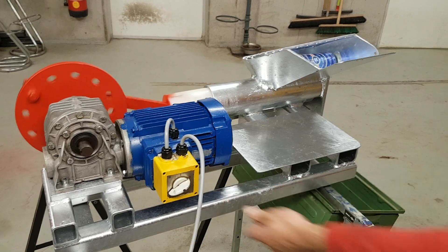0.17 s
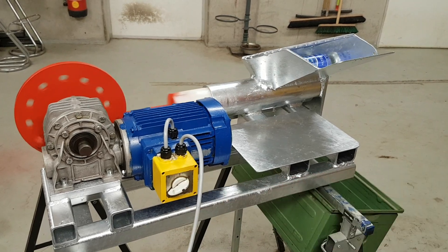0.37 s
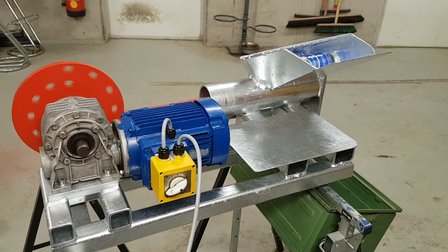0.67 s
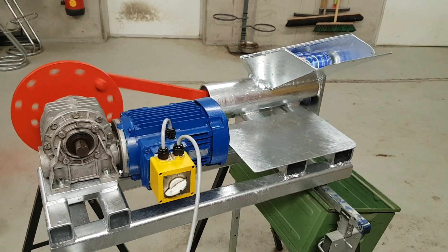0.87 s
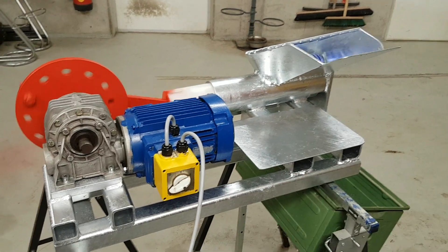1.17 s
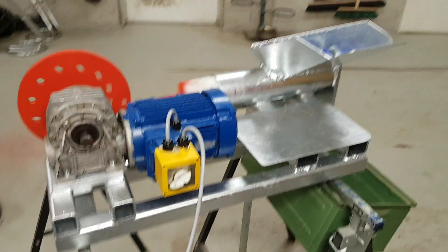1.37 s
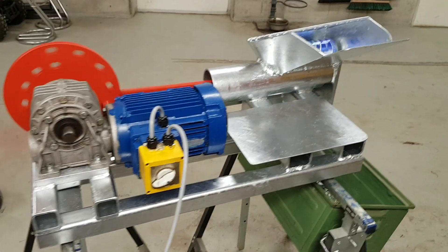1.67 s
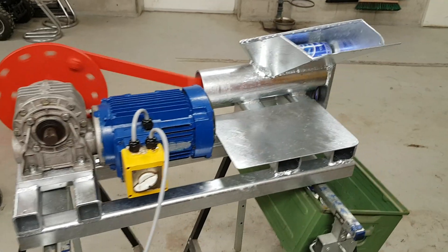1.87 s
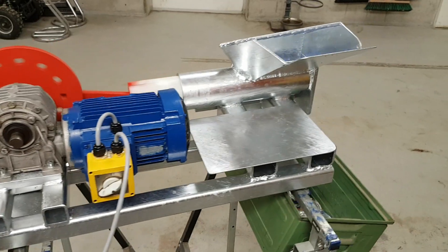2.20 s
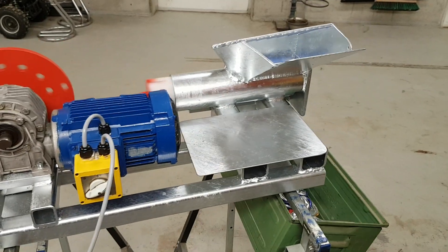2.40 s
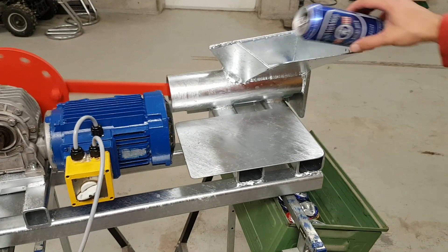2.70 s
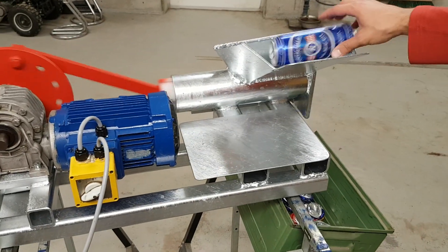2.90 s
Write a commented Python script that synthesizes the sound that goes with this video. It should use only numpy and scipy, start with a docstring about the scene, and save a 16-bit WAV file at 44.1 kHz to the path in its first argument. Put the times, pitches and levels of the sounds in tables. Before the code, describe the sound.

A motor-driven crusher flattens drink cans: each one clinks into a steel tube, then crunches and crackles in two bursts, with clanks between, over a low motor hum, recorded close in stereo in a hard, ringing workshop.

```python
"""Crunching metal about once a second: a can drops into a steel tube, is pushed along, buckles and is flattened.
A geared motor drives the ram and hums behind it; sheet metal booms and the linkage clanks on the return.
Bursts of small impulses and short rings make the crunch, decaying sines the blows, shaped noise the motor.
Early echoes and a hard workshop's ringing surround a two-port microphone."""
import sys
import numpy as np
from scipy import signal
from scipy.fft import rfft, irfft, next_fast_len
from scipy.io import wavfile
from scipy.ndimage import map_coordinates

SR = 44100
rng = np.random.default_rng(int(sys.argv[2]) if len(sys.argv) > 2 else 0)


def to_linear_factor(level_db):
    """Convert decibel levels (scalar or array-like) to linear amplitude factors."""
    exponent = np.asarray(level_db, float) / 20
    return 10 ** exponent


def bounce(signal):
    """Save signal as a 16-bit WAV file at the path given by the first command-line argument."""
    frames = np.transpose(np.atleast_2d(signal))
    limited = np.clip(frames, -1, 1)
    pcm = np.round(limited * 32767).astype(np.int16)
    wavfile.write(sys.argv[1], SR, pcm)


N = 134505

# how strongly the thin can wall sounds at each frequency: (f/Hz, level/dB)
WALL_COLOUR = [(1180, -9.5), (2000, -3.5), (3500, -6), (4400, -9), (6200, -8.5), (9300, -15.5),
               (11800, -16.5), (16000, -24)]


def unit(x):
    """Scaled to rms 1."""
    return x / np.sqrt(np.mean(x ** 2) + 1e-20)


def along(points, hz):
    """Reads a curve of (f/Hz, value) points, with frequency on a log axis."""
    f, v = np.transpose(points)
    return np.interp(np.log(hz + 1), np.log(f + 1), v)


def curves(rows):
    """One value per sample for each column after the time."""
    s, *cols = np.transpose(rows)
    return [np.interp(np.arange(N) / SR, s, c) for c in cols]


def filtered(x, response):
    """Changes x by a complex response of frequency."""
    m = next_fast_len(N + SR)  # room for the tail
    return irfft(rfft(x, m) * response(np.fft.rfftfreq(m, 1 / SR)), m)[..., :N]


def resonances(peaks):
    """Causal response of (f/Hz, width/Hz, level/dB) resonances, added with alternating sign."""
    def response(f):
        total = 0
        for k, (centre, width, db) in enumerate(peaks):
            damping = 1j * f * width
            total = total + (-1) ** k * to_linear_factor(db) * damping / (centre * centre - f * f + damping)
        return total
    return response


def ticks(per_s, size_db):
    """Random impulses, a few of them large."""
    happens, side, size = rng.random((3, N))
    return (happens < per_s / SR) * np.sign(side - .5) * to_linear_factor(-size_db * np.log(size + 0.01))


def wobble(per_s):
    """A smooth random curve through per_s random points a second."""
    points = rng.standard_normal(int(N * per_s / SR) + 4)
    return map_coordinates(points, [np.arange(N) * per_s / SR])


def ring(modes, t, rough):
    """The modes of one blow, each at a fresh level; the phase wanders by rough radians a sample."""
    total = 0
    for hz, db, t60 in modes:
        decay = to_linear_factor(db + rng.normal(0, 2.4) - 60 * t / t60)
        wander = rough * np.cumsum(rng.standard_normal(len(t)))
        total = total + decay * np.sin(2 * np.pi * hz * t + wander)
    return total


def woken(modes, centre_hz, reach_db):
    """The modes of a struck body, reach_db weaker per octave from the centre of the blow."""
    return [(hz, level - reach_db * abs(np.log2(hz / centre_hz)), t60) for hz, level, t60 in modes]


def add(track, s, sound):
    """Mixes a sound into the track at time s."""
    part = track[round(s * SR):][:len(sound)]
    part += sound[:len(part)]


def spread(pair):
    """Turns two unrelated signals into a left and right that agree in the bass."""
    # (f/Hz, left-right likeness from 0 to 1)
    likeness = [(240, 0.98), (950, 0.27), (15000, 0.19)]

    def mid_side(f):
        angle = np.arccos(np.clip(along(likeness, f), -1, 1)) / 2
        return np.array([np.cos(angle), np.sin(angle)])
    mid, side = filtered(pair, mid_side)
    return np.array([mid + side, mid - side])


def turns(x, count):
    """Deals x out in cross-faded turns to count tracks that sum to x, as the sounding spot wanders."""
    place = np.arange(N) / SR / .11  # a new track every 0.11 s
    tracks = []
    for k in range(count):
        distance = np.abs((place - k + count / 2) % count - count / 2)
        tracks.append(x * np.clip(1 - distance, 0, 1))
    return np.array(tracks)


def hall(x):
    """The workshop's ringing: noise in which each frequency dies at its own speed."""
    # (f/Hz, time to fall 60 dB/s)
    hall_t60 = [(100, 1.34), (500, 0.76), (2000, 0.85), (6000, 0.6), (14000, 0.16)]
    delay_s = .006
    hz, t, z = signal.stft(rng.standard_normal((4, 2, SR)), SR, nperseg=256)
    fade = to_linear_factor(-60 * t / along(hall_t60, hz)[:, None])
    tail = signal.istft(z * fade, SR, nperseg=256)[1]
    tail = tail / np.linalg.norm(tail[0, 0])
    delayed = np.pad(x, (round(delay_s * SR), 0))[:N]
    late = turns(delayed, count=4)[:, None]
    return spread(signal.fftconvolve(late, tail, axes=2).sum(axis=0)[:, :N])


def walls(x):
    """Early copies off frame, floor and bin, different for each port."""
    reach_s, level_db = .012, -9
    taps = np.zeros((16, round(reach_s * SR) + 2))  # 8 spots, 2 ports
    for path in taps:
        at = (rng.uniform(.03, 1, size=7) * reach_s * SR).astype(int)
        path[at] = rng.choice([-1, 1], size=7)
    copies = signal.oaconvolve(turns(x, count=8)[:, None], taps.reshape(-1, 2, taps.shape[1]), axes=2)
    return to_linear_factor(level_db) * copies.sum(axis=0)[:, :N]


def motor():
    """Fan and gear noise, partly gathered in the housing's resonances."""
    # colour of the rushing noise: (f/Hz, level/dB)
    rush_colour = [(30, -29), (70, -34), (130, -7), (250, -18), (800, -7), (2000, -18), (16000, -52)]
    # load after switch-on: (t/s, level/dB)
    settling = [(0, 4.5), (1, -2), (3.05, -7)]
    # housing resonances, before their response is squared: (f/Hz, width/Hz, level/dB)
    housing = [(292, 29, 17.5), (903, 110, 17.5)]
    motor_db, whirr_db = -39, -5
    load_db, = curves(settling)
    rush = unit(filtered(rng.standard_normal((2, N)), lambda f: to_linear_factor(along(rush_colour, f))))
    whirr = unit(filtered(rng.standard_normal((2, N)), lambda f: resonances(housing)(f) ** 2))
    return to_linear_factor(motor_db + load_db) * spread(rush + to_linear_factor(whirr_db) * whirr)


def gears():
    """Thin tones of meshing teeth that swell and fade strongly, and squeals as the drive takes up speed."""
    # mesh tones, level before it swells and fades: (f/Hz, level/dB)
    mesh_tones = [(380, -48.5), (880, -52)]
    # squeals: (t/s, length/s, f/Hz, level/dB)
    squeals = [(0, 0.074, 3290, -47.5), (0.137, 0.06, 4230, -43)]
    t, out = np.arange(N) / SR, np.zeros(N)
    for hz, db in mesh_tones:
        out += to_linear_factor(db + 13.0 * wobble(8.72)) * np.sin(2 * np.pi * hz * t + wobble(12))
    for s, length, hz, db in squeals:
        arch = np.sin(np.pi * np.clip((t - s) / length, 0, 1))
        swell = np.sqrt(np.clip(arch, 0, 1))
        out += to_linear_factor(db) * swell * np.sin(2 * np.pi * hz * t + wobble(62))
    return out


def linkage():
    """The linkage takes up its play: a knock and the rough ring of solid steel; the pin rebounds twice."""
    # (t/s, level/dB)
    clanks = [(0.8, -4), (1.77, -8.5), (2.728, -9)]
    # modes of the steel: (f/Hz, level/dB, time to fall 60 dB/s)
    link_modes = [(711, -12.5, 0.3), (1034, -10.5, 0.15), (1174, -13, 0.21), (1409, 1, 0.072),
                  (1450, -22, 0.67)]
    ring_db, knock_db, knock_hz = -6, -6.5, 837
    rebound_s, rebound_db = 0.024, -8
    out, t = np.zeros(N), np.arange(SR // 2) / SR
    for s, db in clanks:
        for k in range(3):
            knock = to_linear_factor(knock_db - 60 * t / 0.02) * np.sin(2 * np.pi * knock_hz * t)
            blow = to_linear_factor(ring_db) * ring(link_modes, t, rough=0.055) + knock
            add(out, s + k * rebound_s, to_linear_factor(db + k * rebound_db) * blow)
    return out


def thumps():
    """One low push of air, with a swing back, when the ram bottoms out."""
    # (t/s, level/dB)
    jolts = [(2.435, -17)]
    out, u = np.zeros(N), np.arange(SR // 10) / SR / 0.0016  # u: time in steps of 1.6 ms
    for s, db in jolts:
        add(out, s, to_linear_factor(db) * u * (2 - u) * np.exp(1 - u))
    return out


def sheet_metal():
    """A can knocks on sheet metal and wakes the low modes of chute and bin near the blow's centre."""
    # (t/s, level/dB, centre f/Hz of the modes it wakes)
    booms = [(0.288, -19, 237), (0.38, -22, 240), (0.501, -15.5, 222), (1.175, -14, 265), (1.33, -17, 255),
             (1.5, -21, 270), (2.141, -5.5, 253), (2.21, -11.5, 330), (2.32, -18.5, 300), (2.622, -24, 405)]
    # modes of chute and bin: (f/Hz, level/dB, time to fall 60 dB/s)
    bin_modes = [(140.9, 4.5, 0.75), (169.9, 2.5, 0.83), (209.7, -1.5, 0.53), (243.2, -1, 0.36),
                 (272, 7, 0.2), (327.6, -1, 0.72), (403.8, 4.5, 0.39)]
    out, t = np.zeros(N), np.arange(SR // 2) / SR
    onset = 1 - np.exp(-t / 0.0016)
    for s, db, centre_hz in booms:
        boom = ring(woken(bin_modes, centre_hz, reach_db=14), t, rough=0.015)
        add(out, s, to_linear_factor(db - 6) * boom * onset)
    return out


def drops():
    """The fresh can's modes ring as it lands in the tube."""
    # (t/s, level/dB, centre f/Hz of the modes it wakes)
    landings = [(0.2196, -9.5, 2780), (1.1076, -15, 3130), (2.0568, -17, 1890)]
    # modes of an intact can: (f/Hz, level/dB, time to fall 60 dB/s)
    shell = [(1044, -2.5, 0.24), (1784, -6, 0.27), (2454, -6, 0.12), (3133, -17.5, 0.18),
             (3651, -11.5, 0.13), (6140, -4.5, 0.18)]
    out, t = np.zeros(N), np.arange(SR // 2) / SR
    for s, db, centre_hz in landings:
        add(out, s, to_linear_factor(db) * ring(woken(shell, centre_hz, reach_db=10), t, rough=0.05))
    return out


def snaps():
    """The can wall snaps in bright bursts that die fast; panels pop in and ring at their own pitch."""
    # sudden snaps: (t/s, level/dB)
    bursts = [(0.2189, -24), (0.2776, -19), (0.4969, -7), (0.5925, -20), (0.9896, -42), (1.1069, -22.5),
              (1.2796, -21.5), (1.4651, -6.5), (1.6053, -19), (1.643, -21), (1.6735, -21), (1.953, -43.5),
              (2.057, -32), (2.2807, -18), (2.389, -22), (2.4214, -23), (2.435, -12.5), (2.51, -22),
              (2.5577, -24.5), (2.6867, -24.5), (2.9785, -43.5), (2.996, -41.5), (3.0444, -35.5)]
    # panels popping in: (t/s, level/dB, pitch f/Hz)
    dents = [(0.245, -4.5, 1750), (0.484, -4, 1213), (0.564, -8.5, 559), (0.612, -4, 1196),
             (0.989, -16, 2520), (1.1071, -4, 926), (1.1068, -14, 544), (1.332, -6.5, 723),
             (1.45, -7.5, 1320), (1.555, -4, 880), (1.573, -3, 892), (1.619, -7, 903), (1.643, -5.5, 823),
             (2.153, -12.5, 907), (2.276, -12, 1500), (2.392, -12, 1145), (2.433, -4, 908),
             (2.537, -12, 717), (2.576, -6.5, 915), (2.998, -36, 1110)]
    # (ratio to pitch, level/dB)
    dent_partials = [(1.004, -1), (1.098, -10.5), (1.801, -18)]
    snap_db, snap_t60_s, spike_db, spike_t60_s = -5, 0.14, 7, 0.012
    dent_db, dent_cycles = -4.5, 64  # cycles to fall 60 dB
    out, env, t = np.zeros(N), np.zeros(N), np.arange(SR // 6) / SR
    fizz = unit(filtered(rng.standard_normal(N), lambda f: to_linear_factor(along(WALL_COLOUR, f))))
    burst_shape = to_linear_factor(-60 * t / snap_t60_s) + to_linear_factor(spike_db - 60 * t / spike_t60_s)
    for s, db in bursts:
        add(env, s, to_linear_factor(db + snap_db) * burst_shape)
    for s, db, hz in dents:
        modes = [(hz * r, level, dent_cycles / (hz * r)) for r, level in dent_partials]
        add(out, s, to_linear_factor(db + dent_db) * ring(modes, t, rough=0.042))
    return out + env * fizz


def creases(centre_hz):
    """Each fold of metal rings for a few cycles, near the wall's pitch at that moment."""
    per_s, size_db = 900, 3.5
    pitch_spread, cycles = 0.444, 18.4  # spread in log frequency; cycles to fall 26 dB
    draw = rng.random((4500, 3))  # gap, size, sign
    at = np.cumsum(-np.log(draw[:, 0] + 1e-9)) / per_s * SR
    pitch = np.exp(pitch_spread * rng.standard_normal(len(at)))
    keep = at < N
    at, draw = at[keep].astype(int), draw[keep]
    hz = (centre_hz[at] * pitch[keep])[:, None]
    k = np.arange(700)  # samples in one ring
    turned = hz * k / SR  # cycles so far
    size = to_linear_factor(-size_db * np.log(draw[:, 1:2] + 0.013)) * np.sign(draw[:, 2:] - .5)
    envelope = (1 - np.exp(-turned)) * np.exp(-3 * turned / cycles)
    grains = size * envelope * np.sin(2 * np.pi * turned)
    return unit(np.bincount((at[:, None] + k).ravel(), grains.ravel())[:N])


def crush():
    """The ram's work: creases ring, fine crackle rides on them, and the can scrapes the tube."""
    # feed and crush: (t/s, level/dB, crackle sharpness/dB, centre f/Hz of the buckling wall)
    strokes = [
        [(0.219, -13, -30, 1667), (0.275, -13, -3.5, 1636), (0.48, -22, -17.5, 928)],
        [(0.482, -13, -3.5, 1160), (0.836, -28, -9.5, 1390), (0.95, -41.5, -66, 850)],
        [(1.105, -26, -35, 900), (1.169, -15.5, -14.5, 1033), (1.448, -22, -16.5, 877)],
        [(1.45, -17, -7, 1367), (1.566, -16, -9, 935), (1.95, -42.5, -25, 918)],
        [(2.057, -23, -28, 1604), (2.135, -30.5, -15, 1360)],
        [(2.14, -23, -4, 1040), (2.152, -16.5, -4, 1130), (2.43, -26.5, -35, 1085)],
        [(2.432, -17.5, 2, 919.7), (2.816, -40.5, -16.5, 1126), (2.95, -64.5, 4, 1250)],
        [(2.978, -39, -10, 1610), (3.05, -29, -29, 1240)],
    ]
    # colour of the scraped tube: (f/Hz, level/dB)
    tube_colour = [(250, -11), (750, 3.5), (1900, 4), (7000, -24)]
    crackle_db, scrape_db = 4, -0.5
    level_db, sharp_db, centre_hz = curves(np.vstack(strokes))
    clock = np.arange(N) / SR
    on = sum((clock >= rows[0][0]) & (clock < rows[-1][0] + .006) for rows in strokes) > 0
    folds = creases(centre_hz)
    crackle = unit(filtered(ticks(2500, size_db=6), lambda f: to_linear_factor(along(WALL_COLOUR, f))))
    scrape = unit(filtered(ticks(3000, size_db=2), lambda f: to_linear_factor(along(tube_colour, f))))
    effort = on * to_linear_factor(level_db + 2 * wobble(60))  # the metal gives way in fits
    return effort * (folds + to_linear_factor(scrape_db) * scrape + to_linear_factor(sharp_db + crackle_db) * crackle)


def scene():
    """The machine reaches the two ports with different level and lag, and the hall rings around it."""
    # (f/Hz, left over right level/dB)
    port_balance = [(200, -1.5), (2400, -2), (5500, -5.5), (9000, 5)]
    left_lag_s, low_cut_hz, hall_db = 8e-5, 111.5, -4.5
    metal = to_linear_factor(-7) * crush() + snaps() + drops() + linkage()
    near = metal + sheet_metal() + gears()
    half = np.array([[.5], [-.5]])  # half the difference to each port

    def ports(f):
        return to_linear_factor(half * along(port_balance, f)) * np.exp(-2j * np.pi * f * half * left_lag_s)
    direct = filtered(near + walls(metal), ports)
    air = direct + to_linear_factor(hall_db) * hall(near)
    trimmed = filtered(air, lambda f: (1j * f / (low_cut_hz + 1j * f)) ** 4)  # thins the bass
    return trimmed + thumps() + motor()


def top_cut(x):
    """Nothing passes above the cut-off."""
    return signal.sosfilt(signal.butter(12, 16100, fs=SR, output="sos"), x)


def record(dry):
    """Peaks round off smoothly below full scale."""
    top, knee = .9, 5  # ceiling; a higher knee bends later
    mix = dry / (1 + np.abs(dry / top) ** knee) ** (1 / knee)
    return top_cut(mix)


dry = scene()
out = record(dry)
bounce(out)
```